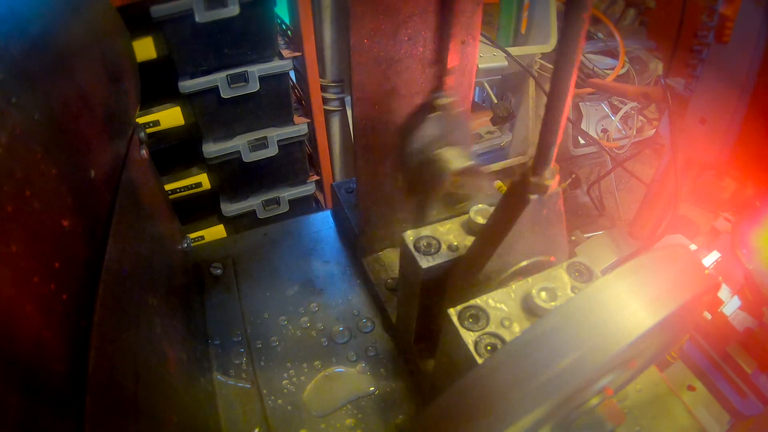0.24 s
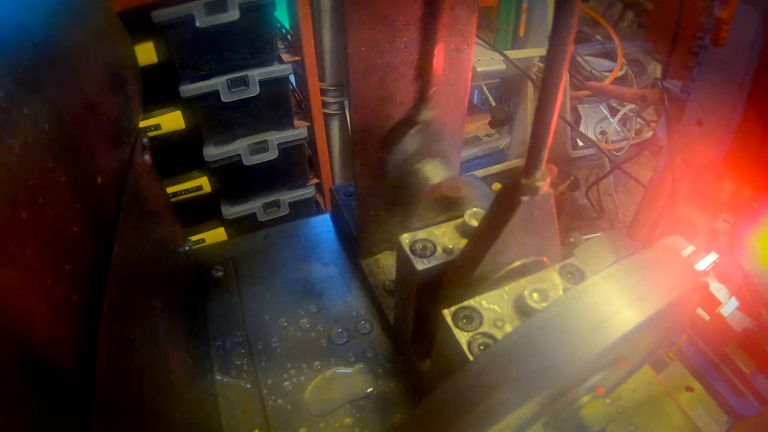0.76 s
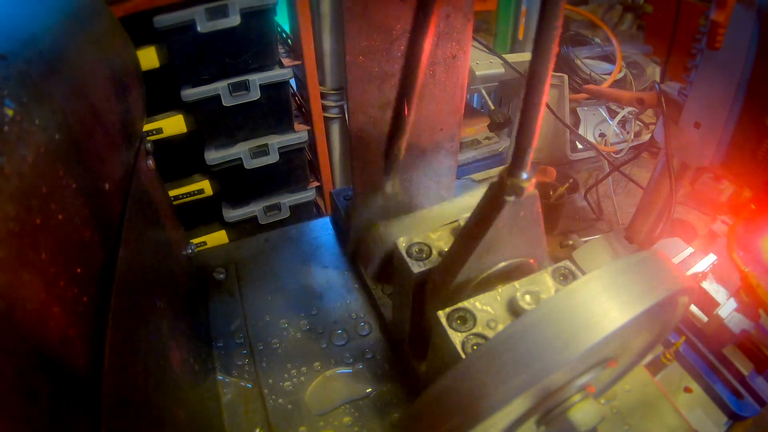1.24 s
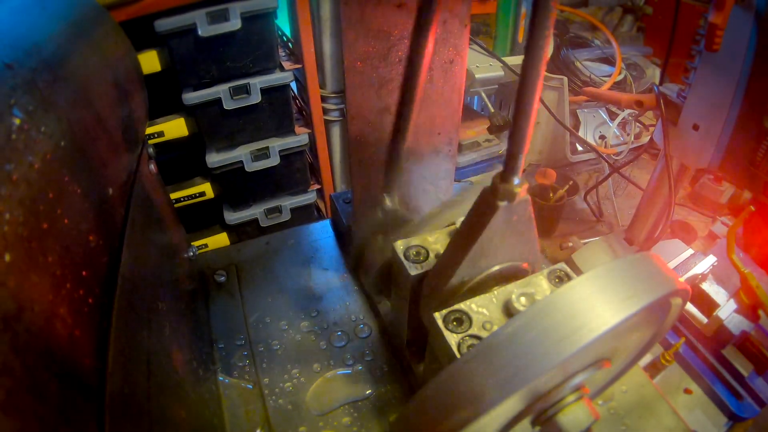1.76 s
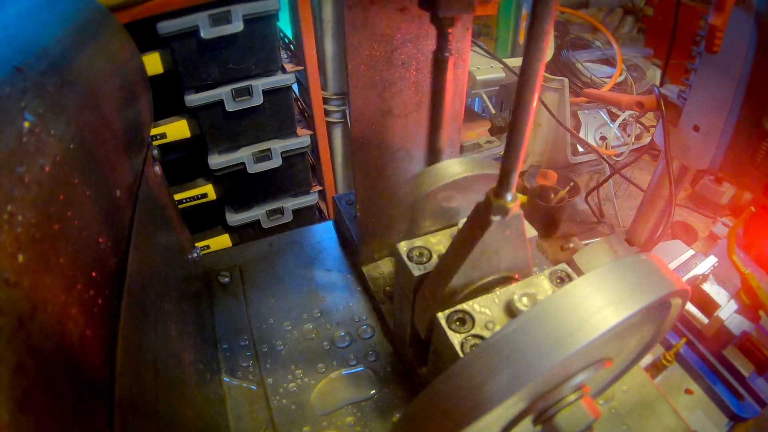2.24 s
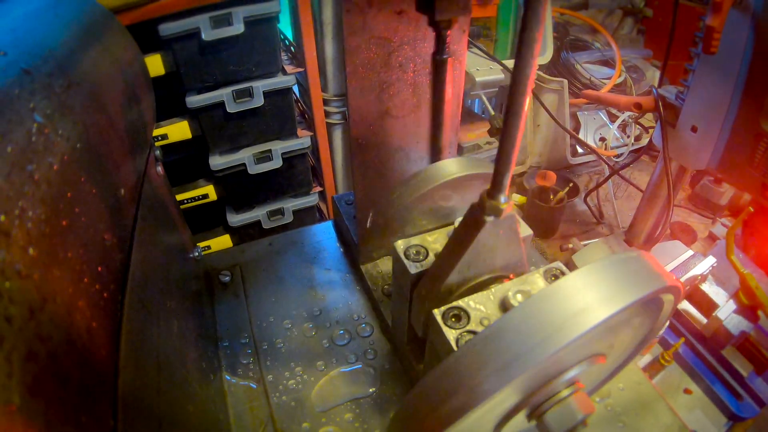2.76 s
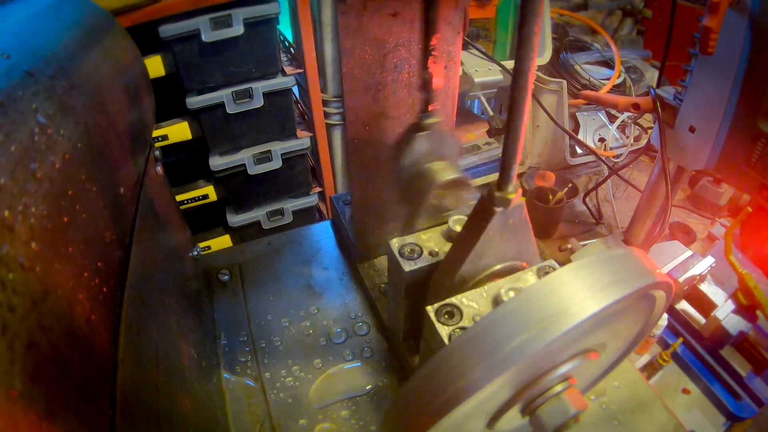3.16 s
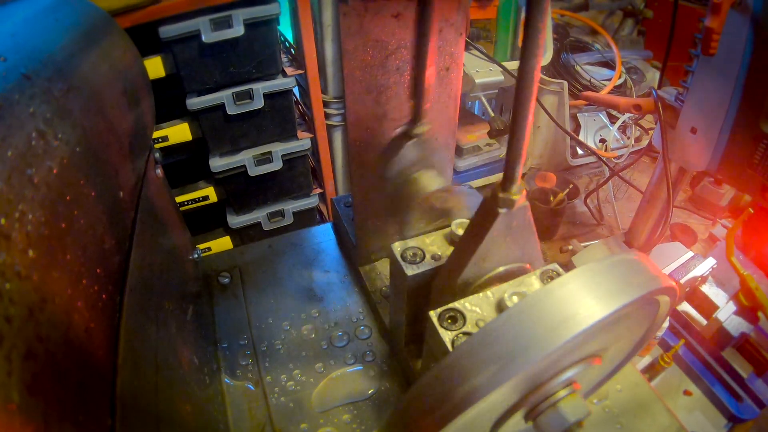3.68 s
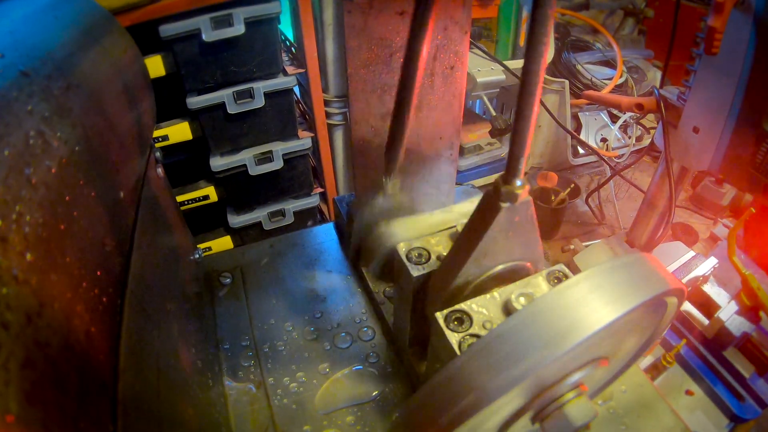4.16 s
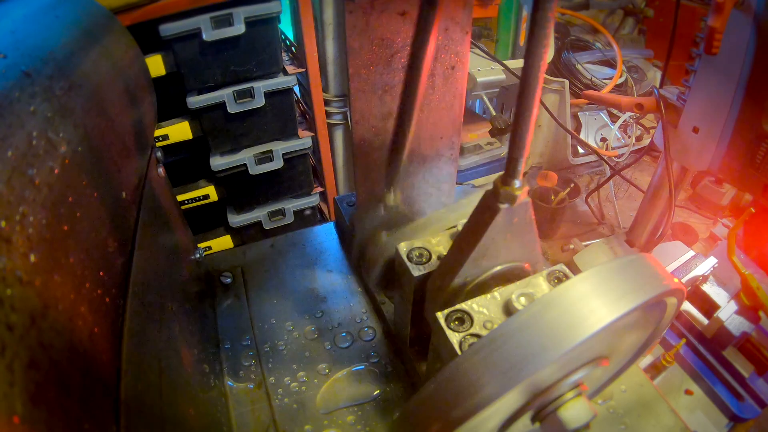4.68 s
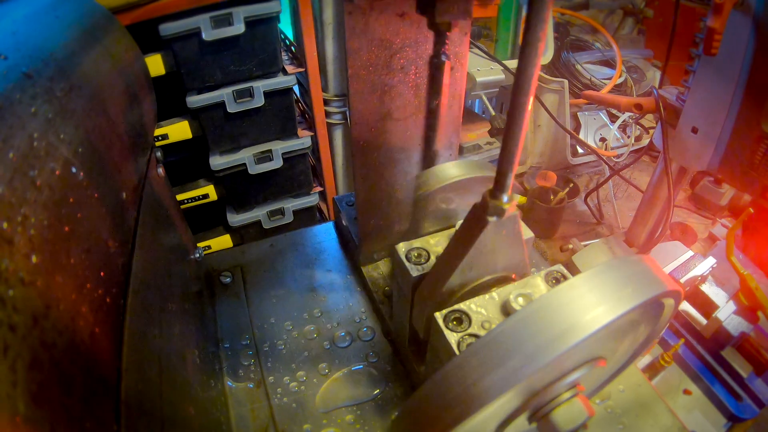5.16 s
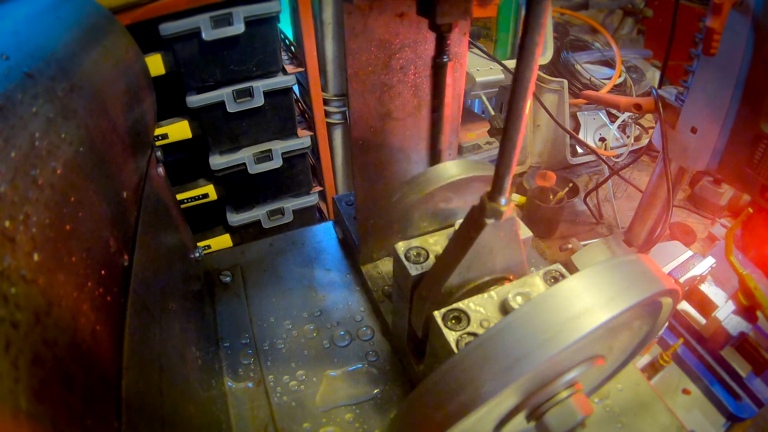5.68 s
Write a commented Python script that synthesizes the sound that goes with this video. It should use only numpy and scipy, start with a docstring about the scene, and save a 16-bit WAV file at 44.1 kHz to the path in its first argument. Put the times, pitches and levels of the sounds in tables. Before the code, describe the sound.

Close stereo pickup of a small steam engine in a cluttered workshop. Nearly four turns a second, each repeats a round of metal knocks, scrapes and dull thumps. Bright steam puffs ride on a constant leaking hiss. A burner roars and drones low behind; a steady mains hum joins from about two to five seconds. Short, dry room echoes.

```python
"""In a workshop a small steam engine runs close by, at just under four turns a second.
Each turn brings the same round of knocks, scrapes and thumps, made of short dying tones.
Steam is coloured noise: puffs of exhaust over a steady leak, with tiny wet bursts.
Behind it the boiler's burner roars as flickering noise and drones as a wavering tone.
A low rumble lies underneath, and a mains hum, one steady tone, comes on for three seconds."""
import sys
import numpy as np
from scipy import signal
from scipy.fft import rfft, irfft
from scipy.io import wavfile
from scipy.ndimage import uniform_filter1d

SR = 44100
rng = np.random.default_rng(int(sys.argv[2]) if len(sys.argv) > 2 else 0)


def transcribe(signal):
    """Save signal, clipped to [-1, 1], as a 16-bit WAV file at the path in sys.argv[1]."""
    frames = np.atleast_2d(signal).T
    limited = np.clip(frames, -1, 1)
    pcm = np.round(limited * 32767).astype(np.int16)
    wavfile.write(sys.argv[1], SR, pcm)


N = 261072
TIME = np.arange(N) / SR
FREQS = np.fft.rfftfreq(N, 1 / SR)


def amp(db):
    """Turns decibels into a gain."""
    return 10 ** (np.asarray(db) / 20)


def unit(x):
    """Scales a sound to an average strength (rms) of 1."""
    return x / np.sqrt(np.mean(x ** 2) + 1e-20)


def read(points):
    """Reads a table over frequency at every FREQS, with straight lines on a log axis."""
    hz, value = np.transpose(points)
    return np.interp(np.log(FREQS + 1), np.log(hz), value)


def follow(rows, clock=TIME):
    """Reads each column of a table over time along a clock, with straight lines between rows."""
    s, *columns = np.transpose(rows)
    return [np.interp(clock, s, column) for column in columns]


def add(mix, s, sound):
    """Adds a stereo sound to the mix at time s; one that starts outside is left out."""
    start = round(s * SR)
    if 0 <= start < N:
        mix[:, start:start + sound.shape[1]] += sound[:, :N - start]


def wander(rate_hz):
    """A random curve of rms 1 whose changes fade out above roughly the given rate."""
    slow = rfft(rng.standard_normal(N)) * np.exp(-(FREQS / rate_hz) ** 2)
    return unit(irfft(slow, N))


def tone(cycles, lead):
    """A sine of rms 1 whose left side is ahead by lead radians."""
    return np.sqrt(2) * np.sin(2 * np.pi * cycles + np.array([[lead], [0]]))


def resonate(x, hz, width_hz):
    """A resonance of gain 1 that follows the curve hz: shift down, smooth, shift back up."""
    spin = np.exp(2j * np.pi * np.cumsum(hz) / SR)
    r = np.exp(-np.pi * width_hz / SR)
    smooth = signal.lfilter([1 - r], [1, -r], x / spin)
    return 2 * (spin * smooth).real


# how alike left and right are: (frequency [Hz], likeness [0 to 1])
LIKENESS = [(25, 0.54), (70, 0.9), (130, 0.97), (290, 0.95), (640, 0.89), (1410, 0.38), (3100, 0.85),
            (5000, 1), (8000, 0.066), (10000, 0.37), (13000, .2)]
# how much louder the left is: (frequency [Hz], left minus right [dB])
BALANCE_DB = [(60, 1), (400, 0), (620, 2), (790, -0.5), (1100, 1.5), (2800, 4.5), (3600, 1), (4300, 2),
              (6400, -1), (7900, 3), (9100, 0.5), (9900, 16), (11000, 8), (15000, 15)]
# how far the left is ahead: (frequency [Hz], lead [radians])
LEAD = [(100, 0), (1300, 0.32), (3000, 0.38), (4600, -0.76), (5800, -1.1), (7200, 2.5), (8400, 1.36),
        (9500, 4), (15000, 0)]


def noise(colour):
    """Stereo noise of rms 1: the right side is part copy of the left, part noise of its own."""
    left, other = rfft(rng.standard_normal((2, N)))
    same = np.clip(read(LIKENESS), 0, 1)
    tilt = amp(read(BALANCE_DB) / 2)
    right = (same * left + np.sqrt(1 - same ** 2) * other) * np.exp(-1j * read(LEAD))
    return unit(irfft(np.array([left * tilt, right / tilt]) * colour, N))


def ring(modes, scatter_db, contact_s=0.00048, detune=0.007, size=5000):
    """One blow on a part, peak 1: dying tones that change a little from blow to blow."""
    t, out = np.arange(size) / SR, np.zeros((2, size))
    chances = rng.standard_normal((len(modes), 4))
    for (hz, db, t60), (luck, phase, skew, load) in zip(modes, chances):
        side_db = np.interp(hz, *np.transpose(BALANCE_DB)) / 2
        lead = skew * (hz / 7000) ** 2  # high tones arrive more out of step left and right
        pitch = hz * (1 + detune * load)
        wave = np.sin(2 * np.pi * pitch * t + np.pi * phase + np.array([[lead], [0]]))
        fade = amp(db + scatter_db * luck - 60 * t / t60)
        out += amp([[side_db], [-side_db]]) * fade * wave
    out *= 1 - np.exp(-(t / contact_s) ** 2)  # the oil film softens the blow
    return out / abs(out).max()


def workshop(x, t60=0.093, size=16000):
    """The cluttered room throws back sparse, quickly dying echoes, different left and right."""
    t = np.arange(size) / SR
    present = rng.random((2, size)) < 2500 / SR  # 2500 echoes per second
    taps = rng.standard_normal((2, size)) * present * (t > .003) * amp(-60 * t / t60)
    taps /= np.linalg.norm(taps, axis=1, keepdims=True)
    return signal.fftconvolve(x, taps, axes=1)[:, :N]


# low air rumble, before level_db: (time [s], level [dB])
RUMBLE = [(0, -41), (.12, -43), (.28, -47), (1.29, -51), (2.46, -46), (3.1, -57), (3.67, -57), (4.22, -42),
          (4.41, -59), (4.64, -44), (5.91, -46)]


def rumble(level_db=-1, centre_hz=32, width_hz=15):
    """Lumpy air movement, felt more than heard: a narrow band of very low noise."""
    swell_db, = follow(RUMBLE)
    return amp(level_db + swell_db) * noise(np.exp(-((FREQS - centre_hz) / width_hz) ** 2))


HUM_ON_S, HUM_OFF_S, HUM_HZ, HUM_DB = 2.09, 5.0, 100.4, -35.5


def hum(fade_s=0.06):
    """A clean hum at twice the mains frequency switches on and off with short fades."""
    on = np.clip(np.minimum(TIME - HUM_ON_S, HUM_OFF_S - TIME) / fade_s + .5, 0, 1)
    return amp(HUM_DB) * on * tone(HUM_HZ * TIME, lead=-0.28)


# colour of the burner's roar: (frequency [Hz], level [dB per Hz])
ROAR = [(12, -30), (45, -16), (68, -13.5), (95, -8.5), (125, 1.5), (165, -1.5), (200, -7.5), (260, -8.5),
        (295, -18), (430, -20), (700, -29), (950, -31), (1200, -25), (3000, -52)]
# the boiler's resonances in the roar: (frequency [Hz], width [Hz], level [dB])
BOILER = [(221, 9, -7.5), (238, 22.3, -3.5), (359, 35, -14), (532.5, 43, -5.4), (602, 63, -11.5),
          (770, 56, -14), (828, 29, -13.5)]
# slow change of the fire and the steam supply: (time [s], flame level [dB], steam level [dB])
FIRING = [(0, 1.5, 0.2), (.8, 0.5, 0.4), (1.6, 0.5, -0.35), (2.6, -0.3, 0), (3.5, -0.5, -0.36),
          (4.4, -0.8, 0.15), (5.2, 0.5, 0), (5.9, 0, -0.8)]
# the firebox drone swells and breaks off, before drone_db: (time [s], level [dB])
DRONE = [(0.0, -29.5), (0.03, -33.5), (0.14, -33), (0.18, -37), (0.36, -32.5), (0.6, -36.5), (0.67, -27.5),
         (0.75, -47), (0.8, -36), (0.98, -28), (1.18, -41.5), (1.36, -34.5), (1.55, -38.5), (1.72, -38),
         (1.77, -41), (1.85, -32.5), (2.01, -36.5), (2.07, -43), (2.18, -39), (2.33, -47), (2.41, -30),
         (2.58, -46), (2.72, -38), (2.76, -60), (2.88, -33), (3.16, -44), (3.21, -36.5), (3.41, -30.5),
         (3.46, -43), (3.6, -44), (3.7, -30), (3.78, -28), (3.89, -40.5), (4.08, -30), (4.25, -29.5),
         (4.33, -44), (4.4, -30.5), (4.54, -36.5), (4.6, -46), (4.65, -30), (4.72, -29), (4.82, -34),
         (4.87, -66), (5.02, -40), (5.11, -37), (5.29, -38.5), (5.39, -49), (5.44, -31.5), (5.52, -35),
         (5.56, -51), (5.65, -35.5), (5.91, -32.5)]
# the drone's pitch, before its waver: (time [s], pitch [Hz])
DRONE_PITCH = [(0.0, 120.2), (0.58, 120.3), (0.72, 123.2), (1.6, 119.8), (1.75, 115), (1.89, 126),
               (1.99, 117), (3.36, 123.5), (3.51, 115.4), (3.63, 122.6), (4.25, 120.8), (4.57, 116.4),
               (4.75, 119.6), (4.88, 110.8), (4.95, 116.0), (5.39, 124.2), (5.79, 117.8), (5.92, 122.8)]
BOILER_RING_HZ = 221.4
# a thin ring of the boiler comes and goes, before ring_db: (time [s], level [dB])
BOILER_RING = [(0, -61), (.55, -53), (.75, -40.5), (1.2, -43.5), (1.6, -42), (2, -39), (2.4, -48.5),
               (3.3, -54), (3.55, -46), (3.85, -41), (4.15, -55), (4.4, -44), (4.7, -40.5), (5.05, -47),
               (5.4, -50.5), (5.65, -37), (5.9, -47)]


def burner(roar_db=-36.0, drone_db=1.0, waver_db=1.4, waver_hz=1.8, ring_db=-2.5,
           flicker_db=0.86, flutter_db=2):
    """Flickering flame noise coloured by the boiler, an unsteady firebox drone and a thin ring."""
    power = amp(read(ROAR)) ** 2
    for hz, width, db in BOILER:
        power = power + amp(db) ** 2 / (1 + ((FREQS - hz) / width * np.sqrt(2)) ** 2) ** 2
    flame_db, _ = follow(FIRING)
    flame = amp(roar_db + flame_db + flicker_db * wander(14)) * noise(np.sqrt(power))

    (level_db,), (pitch,) = follow(DRONE), follow(DRONE_PITCH)
    cycles = np.cumsum(pitch + waver_hz * wander(9.1)) / SR
    drone = tone(cycles, lead=-0.24) * amp(level_db + drone_db + waver_db * wander(19))

    boiler_db, = follow(BOILER_RING)
    cycles = np.cumsum(BOILER_RING_HZ + wander(4)) / SR
    boiler = tone(cycles, lead=-.2) * amp(ring_db + boiler_db + flutter_db * wander(7.2))
    return flame + drone + boiler


# length of one turn, and the first start before the crank's lag
TURN_S, FIRST_TURN_S = .26506, -.0864
# how far the crank falls behind its steady pace: (time [s], lag [s])
CRANK_LAG = [(0, -.0006), (1, .0012), (2.03, .001), (2.5, -.0024), (3.36, -.0013), (3.62, .0006), (5.9, 0)]


def turns():
    """Start of each turn of the crank, around the rod's knock: steady but for a slight drift."""
    steady = np.arange(FIRST_TURN_S, N / SR, TURN_S)
    return steady + follow(CRANK_LAG, steady)[0]


def crank():
    """Seconds since the current turn began, at every moment."""
    starts = turns()
    return TIME - starts[np.maximum(np.searchsorted(starts, TIME) - 1, 0)]


def whirr(level_db=-52.0, centre_hz=970, swing=0.018, width_hz=110, top_s=0.03,
          swell_db=4.0, rough_db=1.5):
    """A faint, rough whirr from the crank: narrow noise that swells and rises once a turn."""
    load = np.cos(2 * np.pi * (crank() - top_s) / TURN_S)
    hz = centre_hz * (1 + swing * load)
    band = resonate(resonate(noise(1), hz, width_hz), hz, width_hz)
    return amp(level_db + swell_db * load + rough_db * wander(60)) * unit(band)


# thumps of one turn, before level_db and scatter: (time after its start [s], peak level [dB])
THUMPS = [(0.009, -36), (0.036, -32.5), (.061, -39), (.130, -34), (.186, -38.5), (.214, -35), (.246, -38)]
# what the bed rings with: (frequency [Hz], level [dB], time to fall 60 dB [s])
BED = [(49, -13, 0.15), (161, 1, 0.078), (181, -4.5, 0.061), (242.5, -3.5, 0.066), (365, -13, 0.039)]


def thumps(level_db=-1, scatter_db=2.0, push_s=0.003, size=6000):
    """Each change of load pushes the bed the same way, and it answers with a dull thump."""
    t, out = np.arange(size) / SR, np.zeros((2, N))
    thump = sum(amp(db - 60 * t / t60) * np.sin(2 * np.pi * hz * t) for hz, db, t60 in BED)
    thump = thump * (1 - np.exp(-(t / push_s) ** 2))
    thump = thump[None] / abs(thump).max()
    for start in turns():
        for (after, db), luck in zip(THUMPS, rng.standard_normal(len(THUMPS))):
            add(out, start + after, amp(level_db + db + scatter_db * luck) * thump)
    return out


# exhaust puffs of a turn, two strong and a weak one between:
# (time after its start [s], strength [dB], rise [s], fade [s])
PUFFS = [(0.019, -2.5, 0.016, 0.032), (.08, -12, .04, 0.033), (0.152, -3.5, 0.017, 0.019)]
BLOW_BY_DB = -5  # steady flow on the same scale as the puffs


def puffs(since):
    """Exhaust flow over the turn: each puff rises and dies away over a steady blow-by."""
    flow = amp(BLOW_BY_DB)
    for after, db, rise_s, fade_s in PUFFS:
        age = (since - after) % TURN_S
        fade = np.exp(-np.maximum(age - rise_s, 0) / fade_s)
        flow = flow + amp(db) * np.minimum(age / rise_s, 1) * fade
    return flow


# far end of the piston's stroke (s into the turn), swing of the cylinder's length (share)
DEAD_CENTRE_S, PISTON_SWING = 0.11, 0.34
CYLINDER_HZ = 2990  # lowest resonance at mid stroke
# which multiples of the lowest resonance ring: one column (multiple)
CYLINDER_ORDERS = (3, 5)


def cylinder(hiss, since, ring_db=-3, width_hz=1700):
    """The cylinder rings like a closed pipe whose length moves with the piston."""
    length = 1 + PISTON_SWING * np.cos(2 * np.pi * (since - DEAD_CENTRE_S) / TURN_S)
    rings = sum(resonate(hiss, k * CYLINDER_HZ / length, width_hz) for k in CYLINDER_ORDERS)
    return hiss + amp(ring_db) * rings


def spit(per_s=420, spread_db=3, count=12):
    """Tiny bursts of wet steam at random moments, each a few cycles long."""
    out = np.zeros((2, N))
    for hz in np.geomspace(2200, 5200, count):
        happens = rng.random(N) < per_s / count / SR
        bursts = happens * amp(spread_db * np.minimum(rng.exponential(1, N), 3))
        burst = ring([(hz, 0, 14 / hz)], scatter_db=0, size=400)
        out += signal.oaconvolve(bursts[None], burst, axes=1)[:, :N]
    return unit(out)


# colour of the exhaust, before the cylinder: (frequency [Hz], level [dB per Hz])
EXHAUST = [(2000, -17), (4200, -16), (5500, -3.5), (7000, 1.5), (7900, 4), (8700, -1), (9250, -6),
           (9900, 0.5), (10500, -6), (10950, -15), (12500, -13.5), (14500, -18.5), (15600, -40)]
# colour of the leaking steam: (frequency [Hz], level [dB per Hz])
LEAK = [(300, -13), (700, -4), (950, -3.5), (1200, -3.5), (1450, 0.5), (1800, -2), (2300, 0), (2850, 2.5),
        (3700, 1), (4050, -2.5), (4550, -1.8), (5100, -1.7), (6400, -1.5), (8500, -1), (11000, -12.5),
        (15000, -31)]
PRESSURE_SWING_DB = 1


def steam(exhaust_db=-36.0, leak_db=-35.5, spit_db=-43, sputter_db=0.34, drift_db=.5):
    """Puffing exhaust noise, leak noise and wet bursts; the last two swell with the pressure."""
    since = crank()
    # the pressure peaks twice a turn
    pressure_db = PRESSURE_SWING_DB * np.cos(2 * np.pi * 2 * (since - DEAD_CENTRE_S) / TURN_S)
    _, supply_db = follow(FIRING)
    hiss = unit(cylinder(noise(amp(read(EXHAUST))), since))
    exhaust = hiss * puffs(since) * amp(exhaust_db + 1.2 * wander(120) + 0.5 * wander(30))
    leak = noise(amp(read(LEAK))) * amp(leak_db + pressure_db + sputter_db * wander(350))
    drops = spit() * amp(spit_db + 0.57 * pressure_db)
    return (exhaust + leak + drops) * amp(supply_db + drift_db * wander(17.0))


# what each part rings with, by name: (frequency [Hz], level [dB], time to fall 60 dB [s])
PARTS = { "rod": [(746, -27, 0.23), (1392, -16.5, 0.048), (1537, -9.5, 0.03), (2018, -4.5, 0.031),
         (2095, -7, 0.046), (2775, -7, 0.038), (3074, -8, 0.062), (3270, -3, 0.015), (3610, -4.5, 0.042),
         (3890, -7, 0.031), (4530, -16.5, 0.071), (5850, -7, 0.05), (6364, -2, 0.024)],
         "link": [(5790, -3.5, 0.011), (6410, -7, 0.016), (6165, -4, 0.017), (6430, -3, 0.014)],
         "slide": [(538, -18, 0.082), (880, -17.5, 0.023), (1424, -15, 0.038), (2310, -7, 0.013),
         (2670, 1, 0.0088), (3720, -3, 0.012), (4550, -8.5, 0.016), (5636, -7.5, 0.032)],
         "crosshead": [(1380, -3, 0.009), (2060, -10, 0.0077), (2340, 1, 0.0085), (2640, 2.5, 0.0068),
         (3370, -11, 0.0051), (4550, -3, 0.0079)], "pin": [(3100, -3, 0.0056), (4900, -6, 0.0052),
         (5230, -3, 0.011), (5660, 0, 0.0097), (5950, -9, 0.0057)], "bearing": [(555, -16, 0.062),
         (1103, -2, 0.021), (1290, -7.5, 0.012), (1660, -3, 0.016), (1988.7, -4, 0.021),
         (2400, -11, 0.0043), (2730, -1, 0.013)], "guide": [(2700, -18, 0.0058), (2880, -6, 0.01),
         (3230, -8.5, 0.0088), (3630, -10.5, 0.011)], "crank": [(385, -10.5, 0.034), (695, -9, 0.058),
         (943, -3.5, 0.029), (1003, -3, 0.043)], "plate": [(526, -4.5, 0.089), (563, -4.5, 0.053),
         (644, -12, 0.038), (773, -5.5, 0.041)], }
# scraping stretches of a turn, before chance changes the level:
# (time after its start [s], length [s], part, ticks per second [1/s], peak level [dB])
SCRAPES = [(.222, .027, "guide", 260, -32), (.075, 0.049, "guide", 98, -38),
           (0.026, 0.075, "link", 92, -41)]


def scrape(spread_db=2.0, stroke_db=1.0, detune=0.036, count=16):
    """Dry metal catches in fine ticks, different in number and strength on every stroke."""
    out = np.zeros((2, N))
    for start in turns():
        for after, length, part, per_s, db in SCRAPES:
            grip_db = db + stroke_db * rng.standard_normal()
            chances, places = rng.random((2, count))
            for chance, place, force in zip(chances, places, rng.exponential(1, count)):
                catch = ring(PARTS[part], scatter_db=1.5, detune=detune, size=600)
                if chance < per_s * length / count:
                    strength = amp(grip_db + spread_db * min(force, 2.5))
                    add(out, start + after + place * length, strength * catch)
    return out


# how long each part takes to press through its oil film: part name, then time [s]
CONTACT_S = {"rod": 0.0018, "link": 0.0036, "slide": 0.00066, "crosshead": 0.00061, "pin": 0.0012,
             "bearing": 0.00076, "guide": 0.00095, "crank": 0.0023, "plate": 0.002}
# when the crosshead judders, before level_db: (time [s], peak level [dB])
JUDDERS = [(0.264, -22), (.529, -20.5), (2.385, -20.5), (2.648, -25), (2.913, -20.5), (4.769, -19.5),
           (5.036, -28)]


def judder(level_db=-3, slip_s=0.0032, count=4):
    """The dry crosshead sticks and slips a few times in quick succession."""
    out = np.zeros((2, N))
    for s, db in JUDDERS:
        for after in np.cumsum(slip_s * rng.uniform(0.501, 1.3, count)):
            slip = ring(PARTS["crosshead"], scatter_db=-1.5, contact_s=CONTACT_S["crosshead"])
            add(out, s + after, amp(db + level_db) * slip)
    return out


# high ring after a tick: (frequency [Hz], level [dB], time to fall 60 dB [s])
TICK_RING = [(5710, -1, 0.0068), (6290, -10, 0.01)]


def tick(db, hz, high_db, left_db=4.5, snap_s=0.00191, early=0.78, crack_db=-17,
         crack_s=0.00082, size=5000):
    """A dry snap of a few cycles that peaks early, with a thin noise crack and a high ring."""
    t, out = np.arange(size) / SR, np.zeros((2, N))
    swell = np.sin(np.pi * np.minimum(t / snap_s, 1) ** early) ** 2
    snap = swell * np.sin(2 * np.pi * hz * t)
    add(out, 0, snap * amp([[left_db / 2], [-left_db / 2]]))
    crack = uniform_filter1d(rng.standard_normal((2, size)), size=4) * np.exp(-t / crack_s)
    high = ring(TICK_RING, scatter_db=2, detune=.003)
    add(out, snap_s / 4, amp(crack_db) * crack + amp(high_db) * high)
    return amp(db) * out[:, :size]


# the valve gear's dry ticks: (time [s], level [dB], pitch [Hz])
VALVE_TICKS = [(0.133, -21, 3000), (0.401, -20, 3040), (0.6645, -22, 3300), (0.9307, -19, 3060),
               (1.196, -21.5, 3140), (1.462, -22, 3070), (1.7271, -19, 3030), (1.9922, -25, 3100),
               (2.2554, -30, 3140), (2.7836, -31, 3100), (3.048, -17.8, 2900), (3.314, -19, 3000),
               (3.58, -26, 3000), (3.8466, -17.5, 2966), (4.111, -20.5, 3083), (4.377, -23, 3100),
               (4.642, -28, 3090), (4.9063, -25, 3100), (5.1712, -20.5, 3070), (5.176, -19.5, 2910),
               (5.4364, -25, 3015), (5.4416, -22, 3160), (5.7015, -23, 3130)]
VALVE_HIGH_DB = -34  # high ring of a valve tick against its snap
# the slide clacks on some turns and a loose pin now and then snaps hard: # (time [s], level [dB], pitch [Hz],
# high ring against the snap [dB])
SNAPS = [(.245, -28, 3100, 0), (0.5382, -22, 2820, -3), (1.0437, -27, 3090, -1), (1.3116, -25, 3050, -9),
         (1.3343, -13, 2930, 0.5), (1.574, -25, 3130, -5), (1.8371, -23, 3100, 4), (2.1054, -25, 3100, -12),
         (2.364, -18.5, 3274, -4), (3.4253, -24, 3160, -5), (3.6908, -32, 3130, 3),
         (4.2255, -20, 2970, -13), (4.248, -16.5, 3260, -8), (4.4872, -27, 3108, -5), (4.773, -25, 2390, 2),
         (5.0203, -26.5, 3087, -5), (5.0429, -13, 3020, -8), (5.2813, -23, 3575, -7),
         (5.2856, -24, 3083, -5), (5.546, -20.5, 3124, -3), (5.5509, -25.5, 3100, -5),
         (5.5737, -13, 2940, -1.5), (5.8122, -25.5, 3100, -7)]


def ticks():
    """The valve gear takes up its play about once a turn; the slide clacks on some turns and a loose pin now
    and then snaps hard."""
    out = np.zeros((2, N))
    for s, db, hz in VALVE_TICKS:
        add(out, s, tick(db, hz, VALVE_HIGH_DB))
    for s, db, hz, high_db in SNAPS:
        add(out, s, tick(db, hz, high_db))
    return out


# knocks of one turn, before chance shifts them (a negative scatter flips the chance):
# (time after its start [s], part, peak level [dB], scatter from turn to turn [dB])
KNOCKS = [(-.011, "pin", -33, 4), (-.005, "rod", -25.5, -1), (-.0015, "rod", -21, 0.5),
          (-.004, "link", -39, 1), (.0005, "link", -32, -2.5), (.0065, "link", -28.5, -1),
          (.0195, "link", -30.5, 1), (.0226, "link", -27, 0.2), (.0565, "slide", -25, 1.5),
          (.0565, "link", -32.5, 3), (.066, "slide", -24, 2.5), (.070, "slide", -26, 0.5),
          (0.086, "slide", -28, -2), (.0936, "slide", -26.5, 2.5), (.1092, "pin", -26.5, 0),
          (.1147, "pin", -32, 1), (.188, "bearing", -25.5, 0), (0.2085, "guide", -28.5, -3),
          (.227, "guide", -28.5, 1), (0.238, "guide", -31, 5), (0.2411, "guide", -30, 0),
          (0.2526, "guide", -36, 5), (-.003, "crank", -40.5, 3), (.018, "crank", -40, 3),
          (0.056, "crank", -40, 1), (.068, "crank", -41, 1), (0.119, "crank", -43.5, 3.5),
          (.237, "crank", -47, 4), (.002, "plate", -40, 1), (0.032, "plate", -36.5, 0.5),
          (.066, "plate", -39.5, 3), (.083, "plate", -40, 2), (.131, "plate", -37.5, 4),
          (.162, "plate", -39.5, 2.5), (.190, "plate", -40.5, 2)]


def gear(level_db=0, jitter_s=.00025):
    """The same round of knocks on every turn, each a little off in time and strength."""
    out = np.zeros((2, N))
    for start in turns():
        chances = rng.standard_normal((len(KNOCKS), 2))
        for (after, part, db, scatter_db), (late, luck) in zip(KNOCKS, chances):
            strength = amp(level_db + db + scatter_db * np.clip(luck, -2, 1.5))
            blow = ring(PARTS[part], scatter_db=0.0, contact_s=CONTACT_S[part])
            add(out, start + after + jitter_s * late, strength * blow)
    return out


def scene(room_db=-9):
    """All sources together; only the knocks, ticks and scrapes get room echoes."""
    background = rumble() + hum() + burner()
    metal = scrape() + judder() + ticks() + gear()
    engine = whirr() + thumps() + steam() + metal
    return background + engine + amp(room_db) * workshop(metal)


def record(dry, edge_hz=15400):
    """Cuts off the treble above the edge with a steep low-pass filter."""
    low_pass = signal.firwin(511, edge_hz, window=("kaiser", 9), fs=SR)
    return signal.oaconvolve(dry, low_pass[None], "same")


dry = scene()
out = record(dry)
transcribe(out)
```